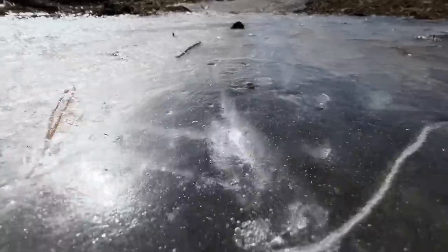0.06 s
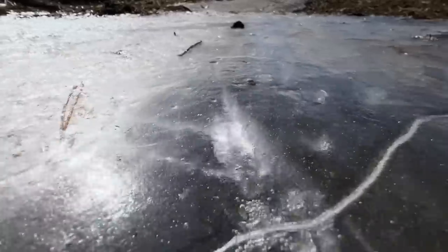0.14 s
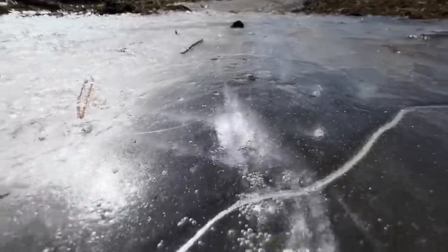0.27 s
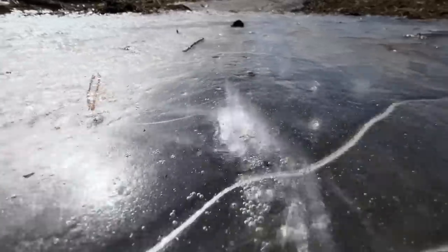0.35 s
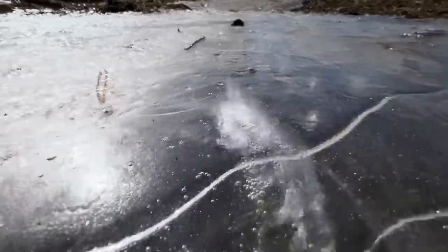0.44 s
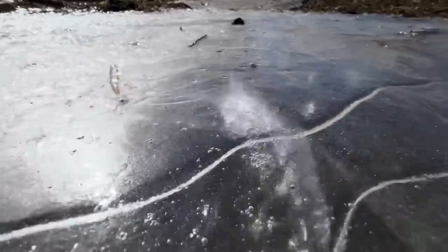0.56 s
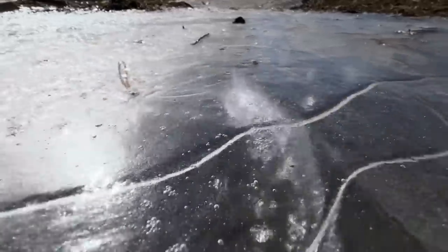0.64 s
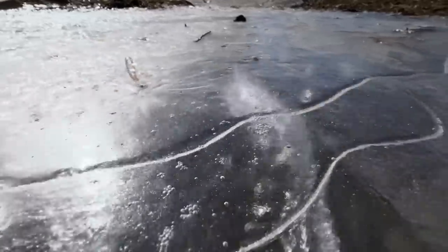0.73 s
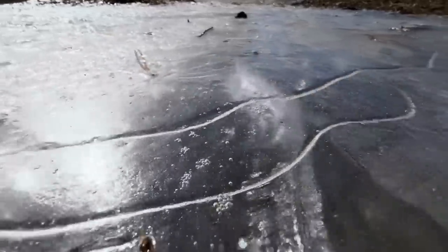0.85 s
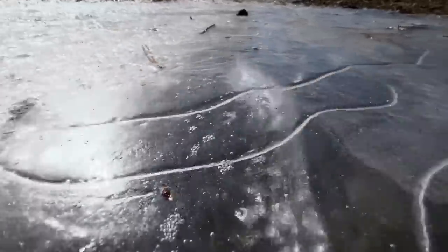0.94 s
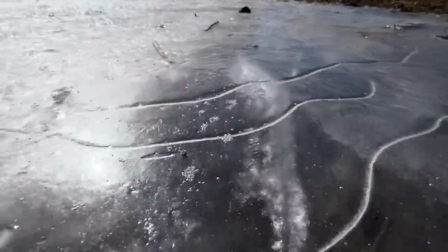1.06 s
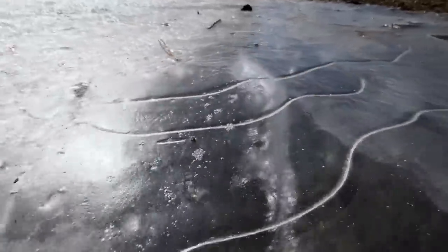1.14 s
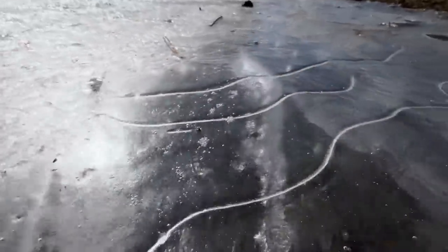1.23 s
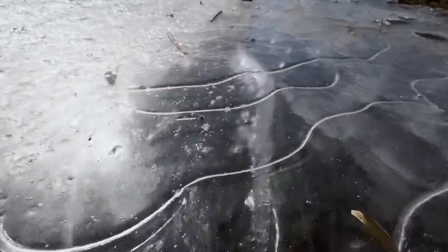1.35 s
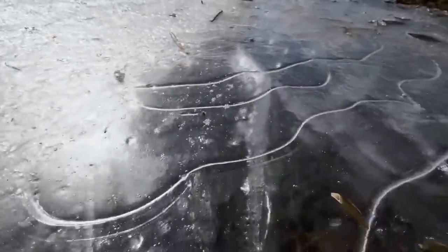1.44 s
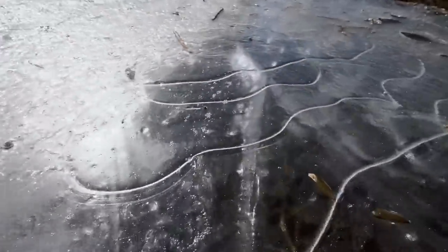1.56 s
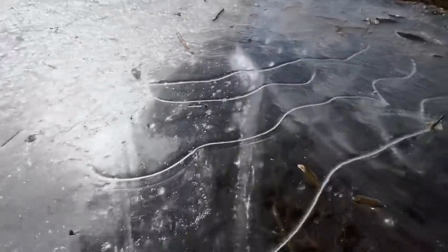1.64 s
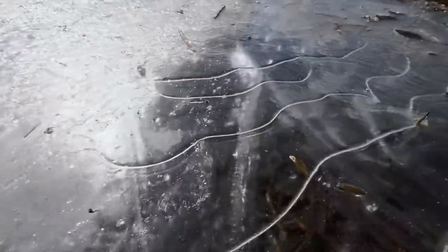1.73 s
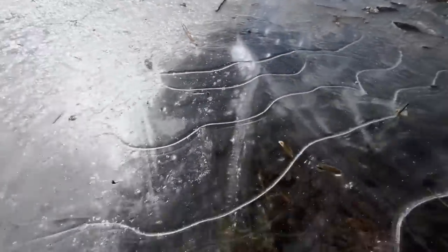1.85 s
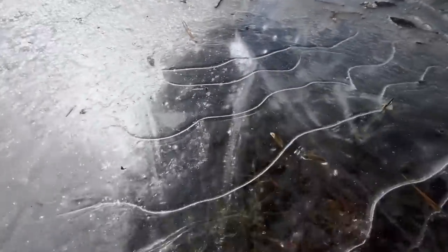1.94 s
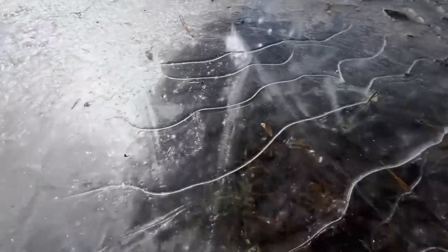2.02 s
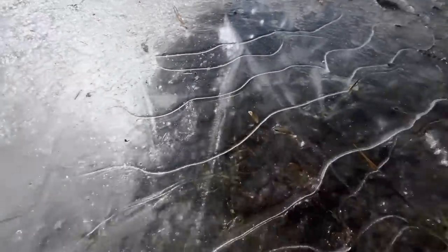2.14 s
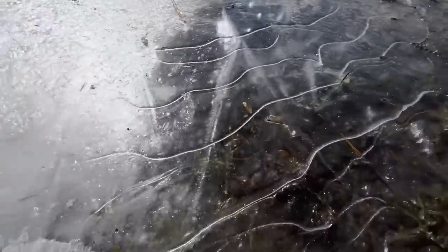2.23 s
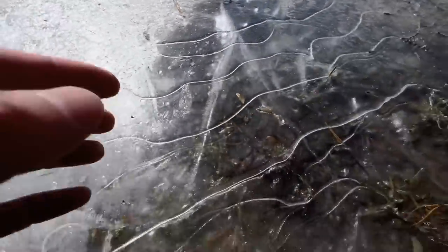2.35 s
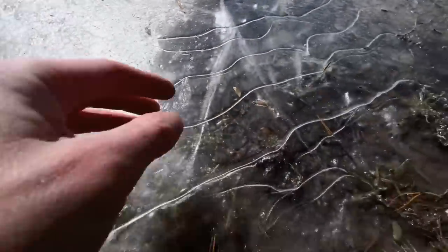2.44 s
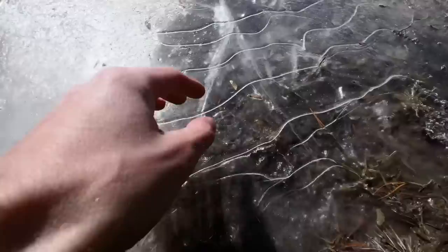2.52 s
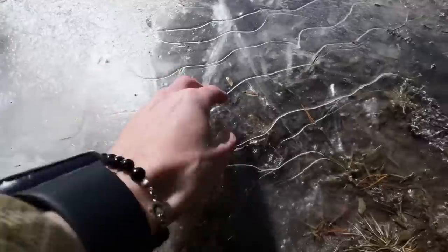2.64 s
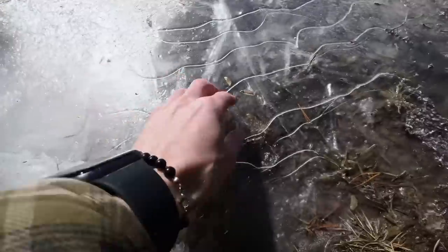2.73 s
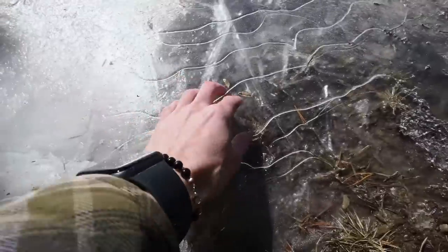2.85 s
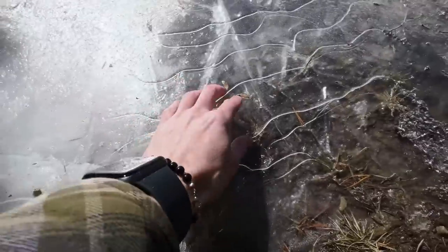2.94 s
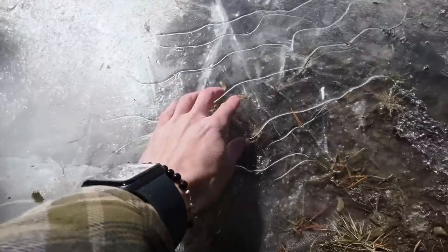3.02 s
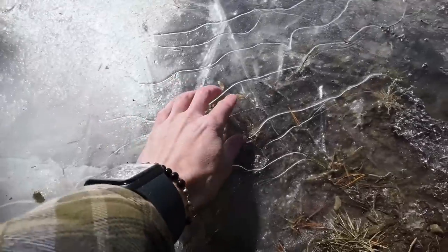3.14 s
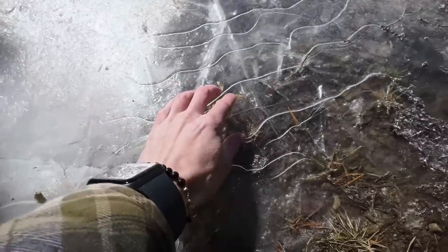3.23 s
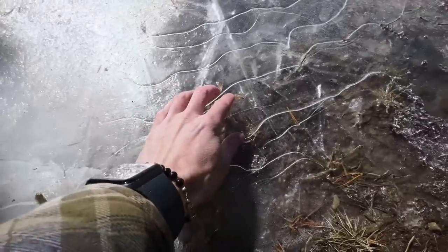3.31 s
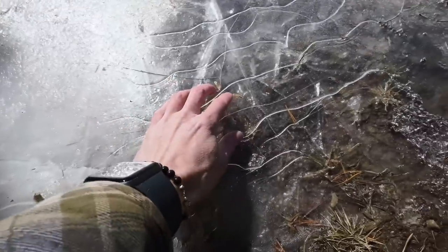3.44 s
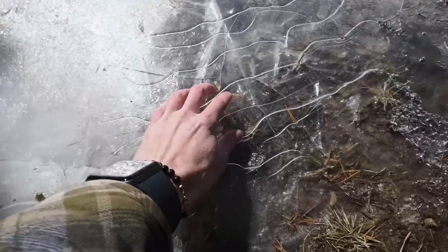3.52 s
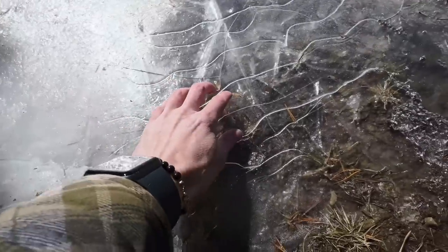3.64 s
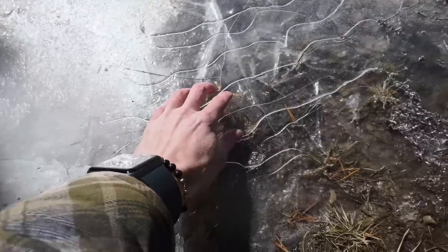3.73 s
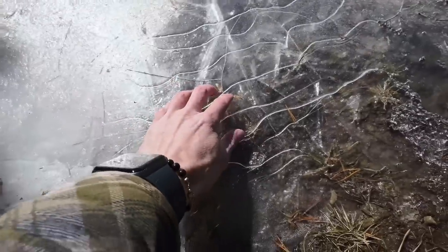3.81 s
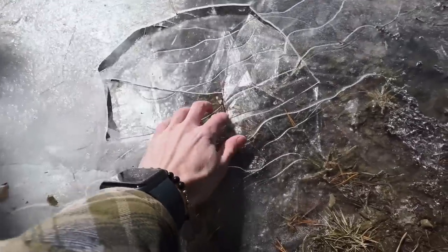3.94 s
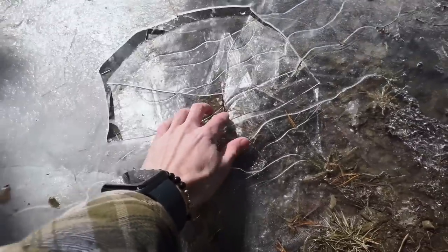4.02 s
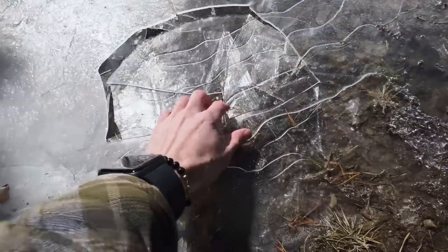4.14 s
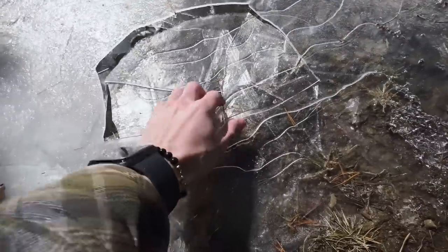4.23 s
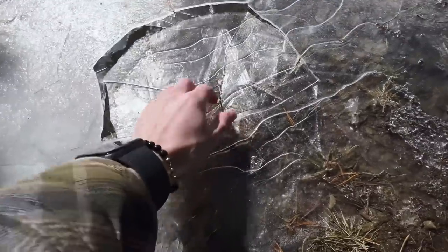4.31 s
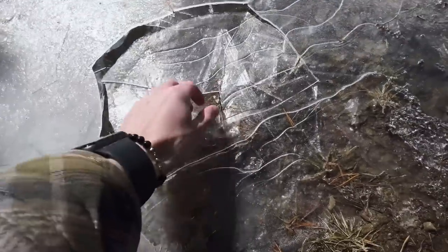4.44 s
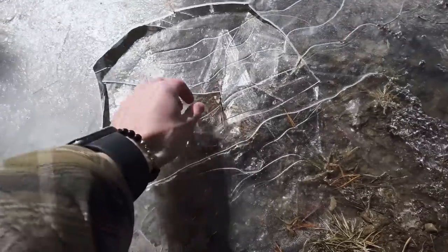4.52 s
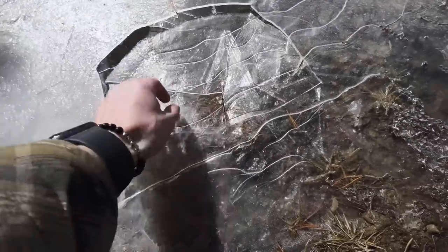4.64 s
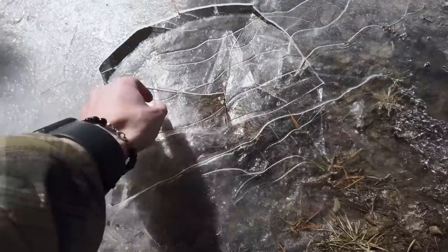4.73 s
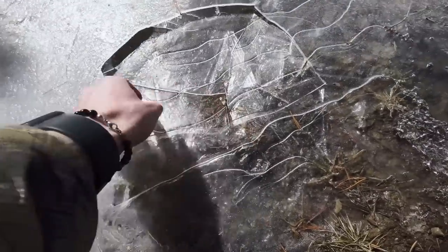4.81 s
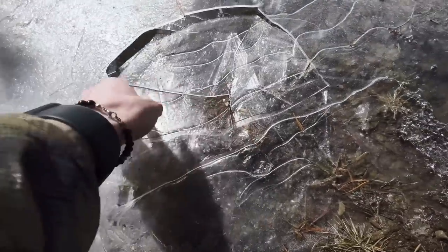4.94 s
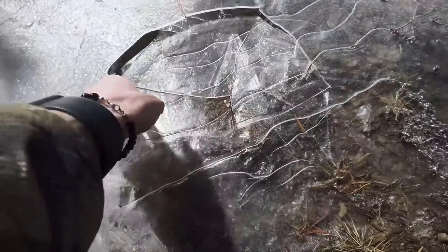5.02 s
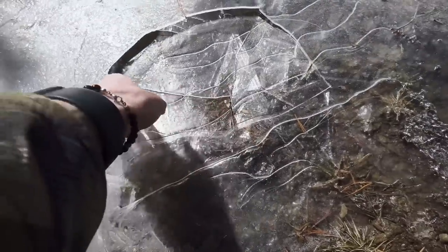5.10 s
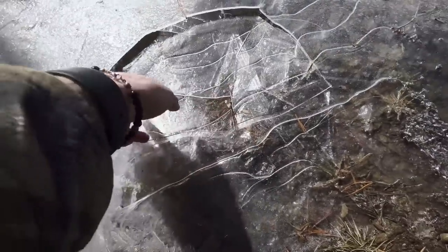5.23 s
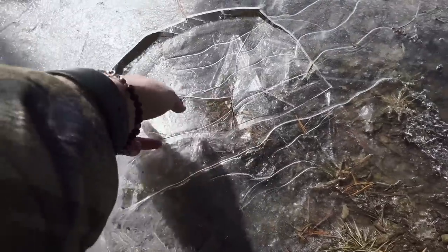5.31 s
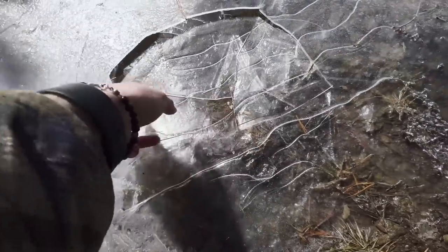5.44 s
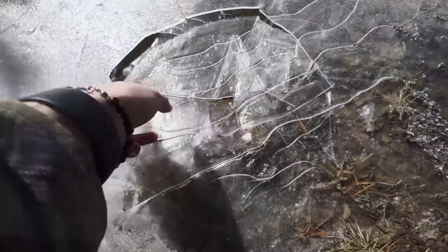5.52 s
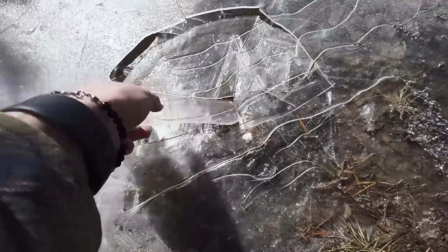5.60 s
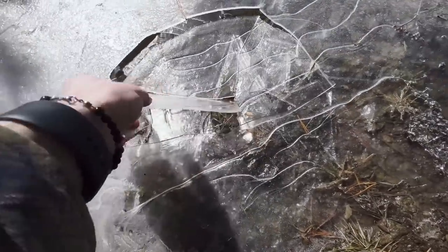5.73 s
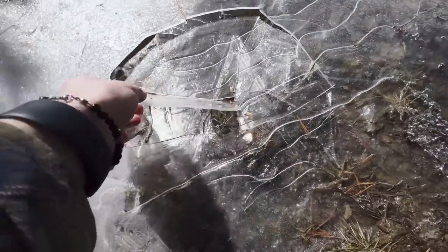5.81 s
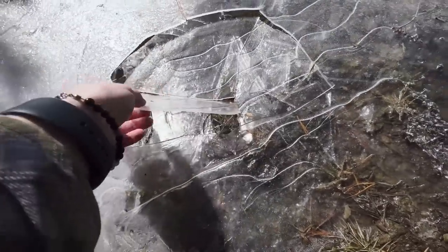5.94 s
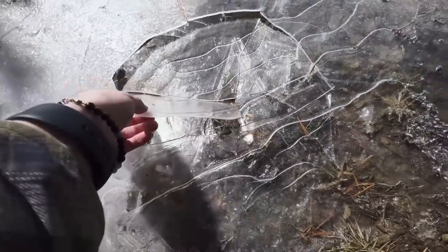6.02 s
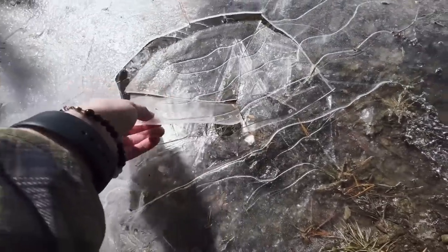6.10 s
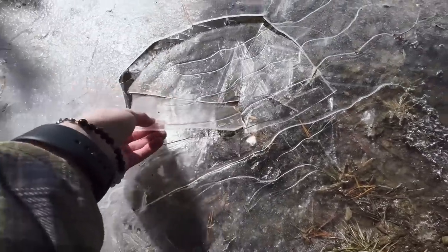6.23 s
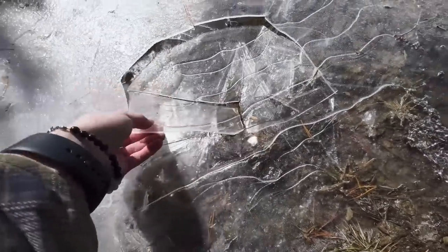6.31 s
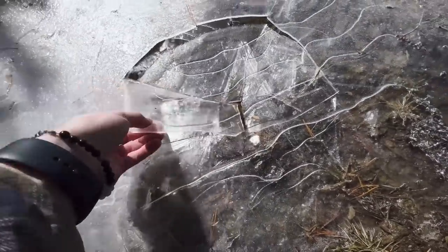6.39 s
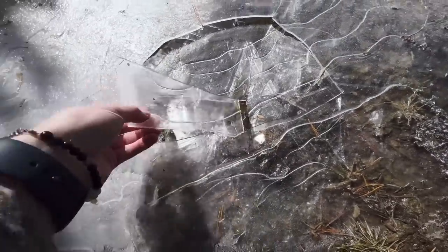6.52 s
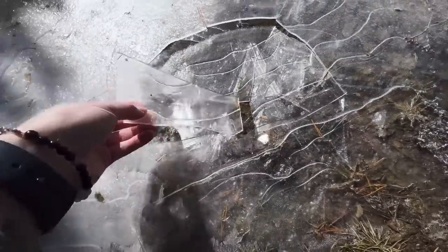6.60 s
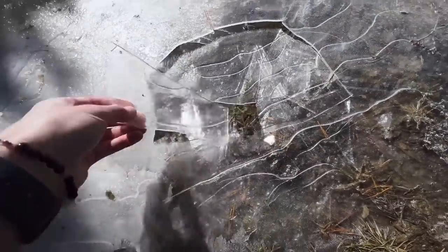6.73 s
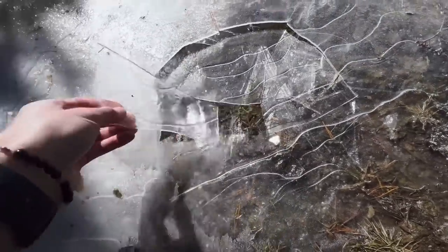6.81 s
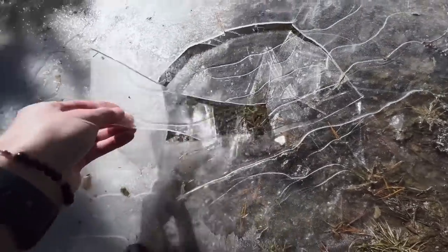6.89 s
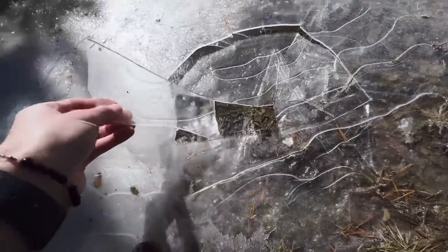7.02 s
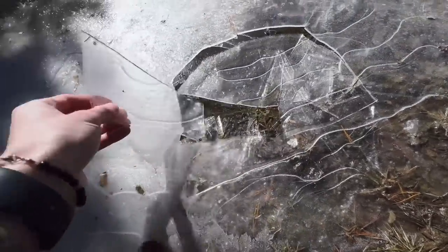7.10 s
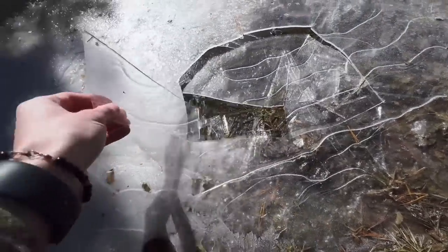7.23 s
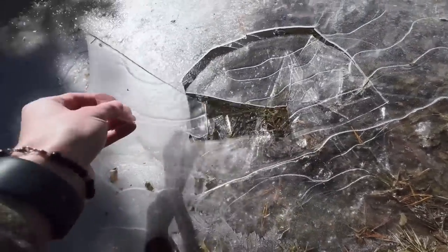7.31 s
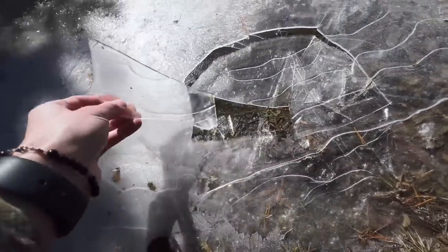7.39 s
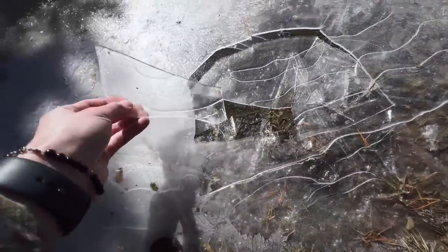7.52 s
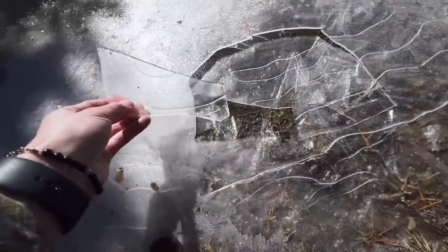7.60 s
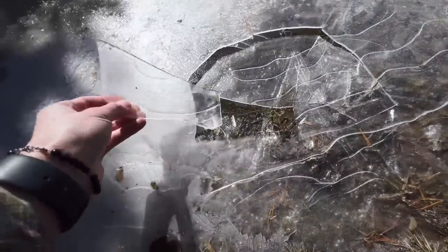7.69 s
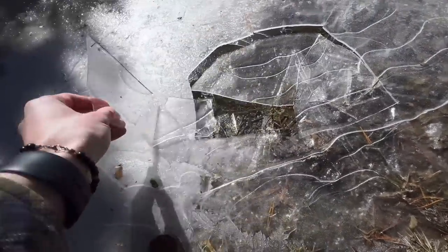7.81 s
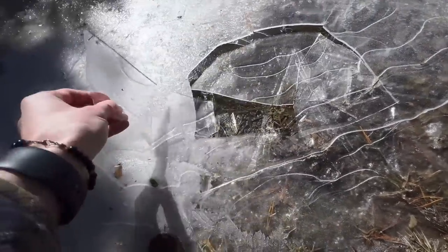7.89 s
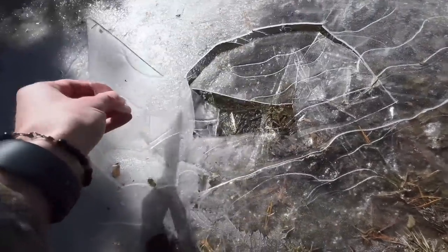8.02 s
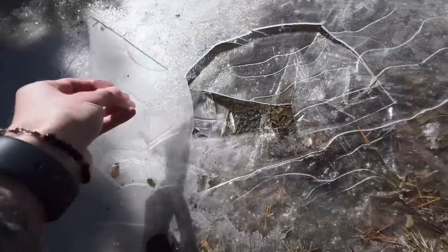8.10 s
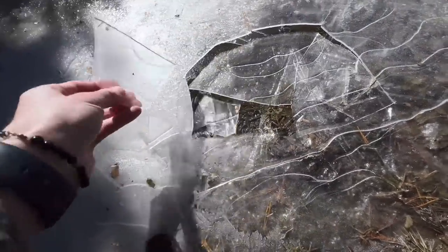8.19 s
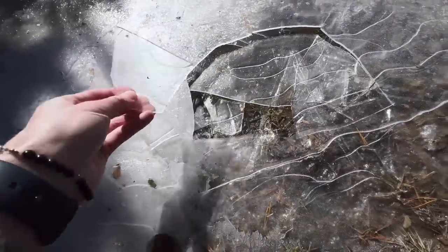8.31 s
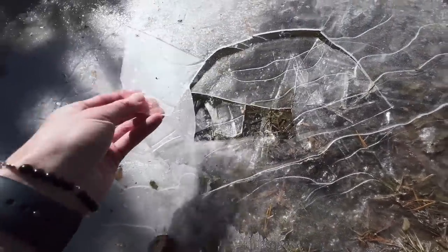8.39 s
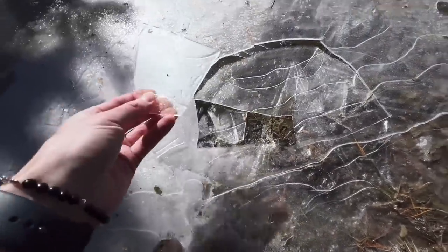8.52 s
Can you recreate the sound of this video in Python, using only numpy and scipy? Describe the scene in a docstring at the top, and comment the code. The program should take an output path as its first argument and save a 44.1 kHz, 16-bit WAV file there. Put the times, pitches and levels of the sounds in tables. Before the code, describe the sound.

Thin puddle ice crackles under a pressing palm, caves in with a sharp crunch, then a loose sheet grates, clinks and snaps in quiet woods.

```python
"""Breaking puddle ice

A hand presses on the thin ice over a forest puddle until it crackles and caves in,
then drags a loose sheet out and snaps it. Cracks are bursts of noise sent through the sheet as
bending waves, treble first, so each falls in pitch; broken edges grate as showers of tiny clicks.
Shards clink as fading sine tones and small birds call far off as gliding whistles.
Filtered noise makes the hush, a puff of wind and the palm's rub; low tones make handling bumps."""
import sys
import numpy as np
from scipy import signal
from scipy.fft import rfft, irfft, next_fast_len
from scipy.io import wavfile
from scipy.ndimage import uniform_filter1d

SR = 44100
rng = np.random.default_rng(int(sys.argv[2]) if len(sys.argv) > 2 else 0)


def put_to_file(sound):
    """Save the sound as 16-bit audio at rate SR, in the file named by the first command-line argument."""
    columns = np.atleast_2d(sound).T  # one column per channel
    safe = np.clip(columns, -1, 1)
    whole_steps = np.round(safe * 32767)
    wavfile.write(sys.argv[1], SR, whole_steps.astype(np.int16))


N = 377055
TIME = np.arange(N) / SR
CUTOFF_HZ = 15900

# In all tables, t60_s is the time to fade by 60 dB, and levels are as they stand before
# the trims in the functions: settings such as level_db that shift a whole layer.


def from_db(db):
    """Turn decibels into a plain gain."""
    return 10 ** (np.asarray(db) / 20)


def rms_one(x):
    """Scale a signal to an rms of 1."""
    return x / np.sqrt(np.mean(x ** 2) + 1e-20)


def add(out, start_s, sound):
    """Mix a sound in at its start time."""
    start = max(0, round(start_s * SR))
    out[start:start + len(sound)] += sound[:N - start]


def band(x, low_hz, high_hz, order=3):
    """Keep only the part of a sound between two pitches."""
    edges = [low_hz, min(high_hz, .45 * SR)]
    return signal.sosfilt(signal.butter(order, edges, "band", fs=SR, output="sos"), x)


def colour(x, spectrum):
    """Shape a signal with a gain curve that falls away outside its ends; rms 1."""
    hz, db = np.transpose(spectrum)
    size = next_fast_len(N)
    f = np.maximum(np.fft.rfftfreq(size, 1 / SR), 1)
    gain = from_db(np.interp(np.log(f), np.log(hz), db))
    gain = gain * np.minimum(f / hz[0], 1) ** 2 * np.minimum(hz[-1] / f, 1) ** 2
    return rms_one(irfft(rfft(x, size) * gain, size)[:N])


def gestures(rows, attack_share, level_column=3):
    """Gain of a row of gestures: each builds up, holds and dies away; overlaps add as power."""
    power = np.zeros(N)
    for row in rows:
        start_s, length_s, t60_s = row[:3]
        t = TIME[:int((length_s + 2 * t60_s) * SR)]
        attack = np.minimum(t / (attack_share * length_s), 1)
        fade_db = -60 * np.maximum(t - length_s, 0) / t60_s
        add(power, start_s, (attack * from_db(row[level_column] + fade_db)) ** 2)
    return np.sqrt(power)


def rings(rows, rise_s):
    """Struck tones that swell for an instant and die away."""
    out, t = np.zeros(N), np.arange(SR // 3) / SR
    for start_s, pitch_hz, level_db, t60_s in rows:
        fade = from_db(level_db - 60 * t / t60_s)
        swell = 1 - np.exp(-t / rise_s)
        add(out, start_s, fade * swell * np.sin(2 * np.pi * pitch_hz * t))
    return out


def through_sheet(x, modes, modes_db, lag_s):
    """Bending waves arrive treble first, late in step with 1 / sqrt(Hz), and set the ice ringing."""
    size = next_fast_len(len(x) + SR // 10)
    f = np.fft.rfftfreq(size, 1 / SR)
    # lag_s is the travel time at 500 Hz; the travel time at CUTOFF_HZ is taken off every pitch
    cycles = lag_s * np.sqrt(500) * (2 * np.sqrt(f) - f / np.sqrt(CUTOFF_HZ))
    x = irfft(rfft(x, size) * np.exp(-2j * np.pi * cycles), size)[:len(x)]
    ringing = 0
    for pitch_hz, width_hz, level_db in modes:
        resonance = signal.lfilter(*signal.iirpeak(pitch_hz, pitch_hz / width_hz, SR), x)
        ringing = ringing + from_db(level_db + modes_db) * resonance
    return x + ringing


def grains(per_s, spread_db, bed_db, spectrum, modes):
    """Tiny fractures of uneven size, each with a brief scatter, sent through the ice; rms 1."""
    sizes = from_db(spread_db * np.minimum(rng.exponential(1, N), 3)) * rng.choice([-1, 1], N)
    clicks = rms_one(sizes * (rng.random(N) < per_s / SR))
    # each click leaves a short trail of noise whose power fades over about 1.6 ms
    trail_power = signal.lfilter([1], [1, -np.exp(-1 / (0.0016 * SR))], clicks ** 2 + 1e-12)
    scatter = np.sqrt(trail_power) * rng.standard_normal(N)
    fractures = clicks + from_db(bed_db) * rms_one(scatter)
    return colour(through_sheet(fractures, modes, modes_db=-4.5, lag_s=0.00399), spectrum)


# tone of the forest air: pitch_hz, gain_db
FOREST = [(15, -50), (25, -26), (42, 2), (64, 2), (170, -4.5), (236, -5), (309, -8), (962, -13.5),
          (1560, -18), (2690, -21), (4030, -24.5), (12500, -33), (16000, -33.5)]
# level at which the hush is heard, from moment to moment: time_s, level_db (in its lower range)
HUSH = [(1.0, -58), (1.6, -56.5), (2.6, -57), (4.76, -64), (5.15, -61), (6.65, -56), (7.07, -59),
        (7.52, -56.5), (8.42, -59)]


def forest_hush(level_db=-1.2):
    """The hush of the forest: noise, strongest in the lows; its heard level drifts and dips."""
    forest = colour(rng.standard_normal(N), FOREST)
    heard_level = from_db(np.interp(TIME, *np.transpose(HUSH)) + level_db)
    return heard_level * forest / np.std(band(forest, 51, 1500))


# one puff of wind: start_s, length_s, t60_s, level_db
GUST = [(0.0, 0.746, 0.27, -45)]
# tone of the wind at the microphone: pitch_hz, gain_db
RUMBLE = [(15, -46), (25, -18), (54, 2), (82, 0.5), (205, -7), (270, -14.5), (339, -7), (477, -17.5),
          (1200, -27), (1560, -41), (2640, -120)]


def wind_puff(level_db=-2.0):
    """A puff of wind on the microphone: low noise that starts quickly and dies away."""
    rumble = colour(rng.standard_normal(N), RUMBLE)
    return from_db(level_db) * gestures(GUST, attack_share=0.0046) * rumble


# clearest ticks of thawing ice: start_s, peak_db, pitch_hz (sets the band of noise)
TICKS = [(0.037, -38.5, 3450), (1.243, -37, 3220), (1.269, -41, 11000), (1.555, -40.5, 9900),
         (1.754, -42, 11000), (2.399, -34, 8900), (4.301, -41, 6000), (4.388, -40.5, 11140),
         (4.576, -39.5, 6160), (4.444, -38, 7100), (4.486, -40.5, 10000), (4.882, -38, 8000),
         (5.884, -31.5, 4580), (6.165, -31, 7960)]


def ticks(t60_s=0.018, level_db=-4.0, faint_per_s=21.0, faint_db=-50.5,
          settle_start_s=5.1, settle_s=2.8, settle_per_s=14.0, settle_db=-49.5):
    """Pinpoint snaps of noise in the sunlit ice, with faint random ones, more as the break settles."""
    out, t = np.zeros(N), np.arange(SR // 20) / SR
    faint = [(u * N / SR, faint_db + 8 * v ** 2, 5000 + 7000 * w)
             for u, v, w in rng.random((int(faint_per_s * N / SR), 3))]
    settling = [(settle_start_s + settle_s * u, settle_db + 8 * v, 5000 + 7000 * w)
                for u, v, w in rng.random((int(settle_per_s * settle_s), 3))]
    for start_s, peak_db, pitch_hz in list(TICKS) + faint + settling:
        burst = rng.standard_normal(len(t)) * from_db(-60 * t / t60_s)
        tick = band(burst, pitch_hz * 0.32, pitch_hz * 1.3, order=2)
        add(out, start_s, from_db(peak_db + level_db) * tick / np.abs(tick).max())
    return out


# rising contact chirps: start_s, start_pitch_hz, rms_db
CHIRPS = [(0.127, 2380, -71), (0.255, 3330, -72), (6.622, 2900, -60), (7.52, 2790, -68), (7.61, 3020, -62),
          (7.686, 3650, -64.5), (8.472, 3440, -53.5)]
CHIRP_S, CHIRP_OCTAVES_PER_S = 0.031, 12.0  # length and average climb, the same for all chirps
UPPER_VOICE_RATIO, UPPER_VOICE_DB = 1.24, -8.5  # a second, higher voice sounds with each chirp
# one short song phrase: start_s, length_s, start_pitch_hz, end_pitch_hz, rms_db
SONG = [(1.94, .062, 2600, 3970, -64), (2.046, 0.021, 5240, 4200, -63), (2.047, 0.017, 2900, 2120, -64),
        (2.07, 0.017, 2850, 3230, -64), (2.115, 0.065, 3450, 3500, -70), (2.169, 0.041, 2830, 2410, -60.5),
        (2.217, .025, 4100, 4520, -61), (2.225, .09, 2820, 3940, -65), (2.253, .028, 5800, 6140, -64),
        (2.258, 0.194, 2623, 2700, -70), (2.3, 0.077, 3720, 3840, -67)]


def birds(waver=0.0043, level_db=1.5, trees_db=-8.0, trees_t60_s=.4):
    """Thin gliding whistles with a slight waver, scattered by the trunks as a fading echo."""
    out, rise = np.zeros(N), 2 ** (CHIRP_OCTAVES_PER_S * CHIRP_S)
    voices = ((1, 0), (UPPER_VOICE_RATIO, UPPER_VOICE_DB))
    chirps = [(start_s, CHIRP_S, hz * ratio, hz * ratio * rise, rms_db + voice_db)
              for start_s, hz, rms_db in CHIRPS for ratio, voice_db in voices]
    for start_s, length_s, start_hz, end_hz, rms_db in list(SONG) + chirps:
        u = np.linspace(0, 1, round(length_s * SR))
        wobble = rms_one(uniform_filter1d(rng.standard_normal(len(u)), size=60))
        hz = (start_hz + (end_hz - start_hz) * u) * (1 + waver * wobble)
        whistle = np.sqrt(u * (1 - u)) * np.sin(2 * np.pi * np.cumsum(hz) / SR)
        add(out, start_s, from_db(rms_db + level_db) * rms_one(whistle))
    echoes = rng.standard_normal(SR // 2) * from_db(-60 * TIME[:SR // 2] / trees_t60_s)
    return out + from_db(trees_db) * signal.fftconvolve(out, echoes / np.linalg.norm(echoes))[:N]


# the palm rests and rubs on the ice: start_s, length_s, t60_s, level_db
RUBS = [(2.72, 0.024, .4, -35), (2.82, 0.21, .5, -41.5), (3.05, 0.33, .5, -45)]
# tone of the rubbing: pitch_hz, gain_db
RUB = [(35, -17.5), (80, -2), (150, -10.5), (195, 4), (250, -15), (700, -20.5), (1500, -29.5)]


def palm_rub(level_db=-3.5):
    """The dull rub of the palm on the ice: low noise."""
    rub = colour(rng.standard_normal(N), RUB)
    return from_db(level_db) * gestures(RUBS, attack_share=0.086) * rub


# cracks and knocks; levels are energy as an rms over 10 ms:
# start_s, level_db, brightness_db_per_octave, thud_db (sheet on its air gap), t60_s (near 1 kHz)
CRACKS = [(2.737, -46, -1.5, -39, 0.1), (2.977, -32.5, 2.4, -38, 0.024), (2.998, -30.5, 1.3, -43, 0.05),
          (3.218, -30, 0.5, -60, 0.065), (3.271, -22, 2, -29.5, 0.053), (3.326, -28.5, 1, -56, 0.062),
          (3.409, -20.5, 3, -15.5, 0.06), (3.425, -21.5, -4, -20, 0.18), (3.437, -27.5, 3.5, -27, 0.14),
          (3.448, -21.5, 1, -46, 0.06), (3.643, -18, 1.3, -25.5, 0.029), (3.827, -17.5, 1.9, -14.5, 0.046),
          (3.843, -11.5, -1.1, -21, 0.17), (3.862, -22, -1.5, -22, 0.1), (3.878, -18.5, 1.5, -24, 0.15),
          (3.909, -19, 1.2, -30.5, 0.38), (4.046, -33, 1, -53, 0.53), (4.106, -40, 2, -70, 0.16),
          (4.229, -51.5, 1.5, -62, 0.095), (4.336, -54.5, 1, -74.5, 0.02), (4.629, -56.5, -.5, -73.5, .05),
          (4.67, -58, 1.5, -72, 0.021), (4.822, -60, 2.5, -69, 0.024), (5.018, -43, -4, -56, 0.059),
          (5.312, -41.5, 2, -70, 0.095), (5.48, -32, 0.5, -57, 0.12), (5.507, -34, 1.9, -40.5, 0.07),
          (5.571, -36, 2.8, -46, 0.26), (5.722, -34, 3.5, -46, 0.11), (5.733, -35, 2, -40.5, 0.066),
          (5.929, -42.5, 3, -68, 0.18), (6.058, -37, -5, -38, 0.043), (6.256, -30.5, 3.5, -43, 0.046),
          (6.292, -31, 3, -55.5, .026), (6.352, -19, 1.3, -27, 0.048), (6.374, -15, -2.7, -18.5, 0.12),
          (6.381, -22.5, 2.5, -26, 0.14), (6.397, -20.5, -8, -27, 0.071), (6.491, -29.5, 1, -40, 0.088),
          (6.752, -18.5, -2.3, -26, 0.051), (6.79, -18, -1.25, -26.5, 0.11), (6.822, -18.5, -3, -30, 0.2),
          (6.858, -21, -1.5, -37, .082), (6.877, -26.5, 0, -37, 0.12), (6.901, -31.5, -1, -50, 0.037),
          (6.926, -31, -.5, -37, 0.062), (6.967, -47, 5.5, -50, 0.031), (7.167, -42.5, 4.5, -66, 0.042),
          (7.183, -47, 8, -56.5, 0.17), (7.194, -23.5, -1.1, -15.5, 0.1), (7.218, -31, -6, -25, 0.089),
          (7.321, -55.5, 0, -69, .031), (7.752, -22.5, 4, -24.5, 0.03), (7.765, -36, -9, -17, 0.032),
          (7.781, -26.5, 0.5, -29.5, 0.31), (7.806, -23.5, 2.5, -46, 0.014),
          (7.813, -24.5, 2.5, -28.5, 0.016), (7.825, -24.5, -0.5, -28, 0.083),
          (7.845, -25, 0.9, -47, 0.074), (8.013, -30, 0, -40.5, 0.066), (8.072, -27.5, -1, -60, 0.093),
          (8.15, -35, 1.5, -52, 0.13), (8.221, -22, 4, -68, 0.065), (8.25, -31, 3, -48, 0.09),
          (8.292, -44, 0.5, -65, .029), (8.357, -59, 3, -76.5, 0.031)]
# borders between the five registers, thud to snap: pitch_hz
REGISTER_EDGES_HZ = [70, 330, 800, 2500, 6500, 16000]
# share of a crack in each register above the thud, at even brightness:
# hollow_db, clack_db, clink_db, snap_db
SHEET_REGISTERS = (-4, 0.5, -1.5, -5.5)
PIECE_REGISTERS = (-5.5, 1, -0.5, -7)
# resonances of the whole sheet over its air gap: pitch_hz, width_hz, level_db
SHEET = [(190, 16, -1.5), (495, 39, 5.5), (690, 20, 3.5), (1450, 56, -3), (3050, 330, 8), (3540, 180, 1.5),
         (4970, 40, -11), (5420, 98, -12), (6830, 63, -4), (7940, 230, 1.5), (7700, 65, 5.5),
         (11400, 1100, 1.5), (14000, 80, 3.5)]
# resonances of the loose piece: pitch_hz, width_hz, level_db
PIECE = [(252, 17.9, 6), (394, 28, 7), (477, 170, 7.5), (692, 72, 7), (1130, 12.2, 6), (1175, 30, -10),
         (1750, 18, 4), (2240, 40, -4.5), (2700, 22, 4.5), (2906, 84, 4), (3297, 250, 1), (3874, 117, 4),
         (4730, 120, 2.5), (5130, 25, 2), (5480, 59, -2), (7210, 100, -16), (11240, 570, 4.5)]
LOOSE_S = 4.8  # time at which the hand turns from the whole sheet to the loose piece


def cracks(direct=.5, scatter_db=4.5, tail_db=-31.5, tail_t60_s=0.25, damping=0.28,
           tear_s=0.00045, level_db=-1.24, pivot_hz=1400):
    """A sharp release, then a swarm of reflections from the edges; treble dies first."""
    out, t = np.zeros(N), np.arange(SR // 5) / SR
    lows, highs = np.array(REGISTER_EDGES_HZ[:-1]), np.array(REGISTER_EDGES_HZ[1:])
    centres = np.sqrt(lows * highs)
    for start_s, crack_db, brightness, thud_db, t60_s in CRACKS:
        whole = start_s < LOOSE_S
        modes, registers = (SHEET, SHEET_REGISTERS) if whole else (PIECE, PIECE_REGISTERS)
        tilt_db = brightness * np.log2(centres[1:] / pivot_hz)
        levels = [thud_db, *(crack_db + np.array(registers) + tilt_db)]
        unevenness = from_db(scatter_db * rng.standard_normal(len(t)))
        swarm = rms_one(rng.standard_normal(len(t)) * unevenness)
        swarm = swarm * (1 - np.exp(-t / tear_s))  # the crack takes an instant to run
        sign = rng.choice([-1, 1])
        softness = min(1, 0.034 / t60_s)  # long tears have a softer start
        wave = 0
        for low, high, hz, register_db in zip(lows, highs, centres, levels):
            life_s = t60_s * (hz / 1000) ** -damping
            paths = swarm * (from_db(-60 * t / life_s) + from_db(tail_db - 60 * t / tail_t60_s))
            paths[0] += sign * direct * np.linalg.norm(paths) * softness
            part = band(paths, low, high)
            wave = wave + from_db(register_db + level_db) * part / np.linalg.norm(part)
        rung = through_sheet(wave, modes, modes_db=-4.5, lag_s=.004)
        # the sheet changes the tone but not the energy; the last factor is the 10 ms rms
        add(out, start_s, rung * np.linalg.norm(wave) / np.linalg.norm(rung) * np.sqrt(SR / 100))
    return out


# pushes of the palm, the last one caving the sheet in:
# start_s, length_s, t60_s, crackle_db, flexing_db
PUSHES = [(2.94, 0.072, 0.13, -44.5, -48.5), (3.064, 0.054, 0.15, -28.5, -40),
          (3.205, 0.15, 0.42, -29, -54.5), (3.385, 0.069, 0.043, -19, -33.5),
          (3.465, 0.069, 0.05, -40.5, -50.5), (3.57, 0.067, 0.6, -41.5, -53),
          (3.643, 0.027, 0.13, -32.5, -31.5), (3.738, 0.041, 0.6, -27, -29.5),
          (3.835, 0.02, 0.35, -18, -28.5)]
PUSH_ATTACK_SHARE = .27  # part of each push's length spent building up
# tone of the crackle: pitch_hz, gain_db
CRACKLE = [(90, -16.5), (200, -8.5), (500, -5.5), (1100, -2), (3000, -1.5), (4500, 0.5), (8000, -2.5),
           (11300, -4.5), (16000, -6.5)]
# tone of bending ice: pitch_hz, gain_db
FLEXING = [(70, -9.5), (110, -5.5), (300, -5.5), (480, -1.5), (750, -4.5), (1500, -4.5), (3000, -17),
           (8000, -34)]


def pressing(crackle_db=2.0, flex_db=-1.5):
    """Cracks creep through the loaded ice as a dense crackle while the sheet flexes."""
    crackle = gestures(PUSHES, PUSH_ATTACK_SHARE) * grains(2000, 6.0, 2.4, CRACKLE, SHEET)
    flex_gain = gestures(PUSHES, PUSH_ATTACK_SHARE, level_column=4)
    flex = flex_gain * grains(500, 0.63, 0.1, FLEXING, SHEET)
    return from_db(crackle_db) * crackle + from_db(flex_db) * flex


def chips(per_s=520.0, level_db=-9.0, spread_db=4.0, cycles=170.0, low_hz=1500, high_hz=11000,
          fall_db=2.0, count=36):
    """Splinters are knocked about wherever the ice crackles or grates; each size has its own pitch."""
    activity = gestures(PUSHES, PUSH_ATTACK_SHARE) + gestures(SLIDES, SLIDE_ATTACK_SHARE)
    out, force = np.zeros(N), 2 * rng.random(N) - 1
    for smallness in (np.arange(count) + rng.random(count)) / count:
        hz = min(low_hz * (high_hz / low_hz) ** smallness, .4 * SR)
        at = np.flatnonzero(rng.random(N, dtype=np.float32) < per_s / count / SR)
        knocks = np.full(N, 1e-18)
        knocks[at] = activity[at] * from_db(level_db - fall_db * smallness + spread_db * force[at])
        # a ringing filter that fades by 60 dB in the given number of cycles
        r, w = from_db(-60 * hz / (cycles * SR)), 2 * np.pi * hz / SR
        out += signal.lfilter([0, np.sin(w)], [1, -2 * r * np.cos(w), r * r], knocks)
    return out


# handling bumps: start_s, pitch_hz, level_db (before the swell), t60_s
BUMPS = [(3.606, 52.6, -30.5, 0.32), (4.375, 62, -45.5, 0.14), (4.594, 67, -27, 0.12),
         (7.385, 45.6, -41, 0.15), (7.622, 61.6, -25.5, 0.12), (7.664, 48.8, -31.5, 0.25)]


def handling_bumps():
    """Handling thumps at the microphone: short, very low tones."""
    return rings(BUMPS, rise_s=0.0019)


# shards and the loose piece ringing: start_s, pitch_hz, level_db (before the swell), t60_s
SHARDS = [(4.044, 4840, -32.5, 0.082), (4.046, 3500, -35, 0.089), (4.107, 3490, -39, 0.097),
          (5.909, 4200, -43, 0.092), (5.928, 3740, -40, .07), (6.374, 2080, -9, 0.041),
          (6.378, 2660, -11.5, 0.046), (6.385, 374, -11, 0.12), (6.794, 486, -6.5, 0.057),
          (6.808, 520, -20, 0.099), (6.859, 540, -13.5, 0.058), (6.905, 505, -19, 0.078),
          (6.967, 1980, -30.5, 0.027), (7.181, 4870, -28.5, 0.07), (7.184, 1934, -32, 0.12),
          (7.202, 442, -10, 0.061), (7.203, 264, -20, 0.13), (7.766, 380.5, -14.5, 0.12),
          (7.77, 1136, -17, .14), (7.782, 4170, -18, 0.087), (7.805, 4100, -1, 0.019),
          (7.814, 5300, -8, 0.024), (7.825, 5240, -9, 0.034), (7.825, 2065, -22, 0.11),
          (8.172, 2040, -30.5, .25), (8.221, 3570, -2, 0.011), (8.225, 1656, -12.5, .042),
          (8.252, 2430, -5, 0.018)]


def shards():
    """Pieces of ice clink and ring: each is a pure tone that dies away fast."""
    return rings(SHARDS, rise_s=0.00029)


# slides of the broken edges over each other:
# start_s, length_s, t60_s, grating_db, flexing_db
SLIDES = [(4.89, 0.045, 0.83, -52, -56), (5.18, 0.26, 0.37, -53.5, -55), (5.31, 0.019, 0.14, -44.5, -58),
          (5.41, 0.099, 0.81, -35, -42.5), (5.6, 0.084, 0.98, -43.5, -72), (5.9, 0.027, 0.31, -44.5, -49),
          (5.99, 0.11, 0.43, -46.5, -68), (6.17, 0.21, .1, -36, -66), (6.215, 0.064, .3, -39.5, -52.5),
          (6.308, .04, .15, -25.5, -34), (6.36, 0.022, 0.21, -22, -14.5), (6.805, 0.053, 0.098, -28.5, -38),
          (7.196, .012, 0.16, -35, -28), (7.752, 0.028, 0.29, -28, -16.5), (7.86, 0.31, 0.25, -47, -39.5),
          (7.98, 0.061, 0.23, -37, -32), (8.07, 0.095, 0.11, -36, -25.5), (8.175, 0.031, 0.15, -30.5, -64)]
SLIDE_ATTACK_SHARE = 0.36  # part of each slide's length spent building up
# tone of the grating: pitch_hz, gain_db
GRATING = [(150, -21), (300, -22.5), (560, -13), (950, -8.5), (1800, -4.5), (2900, -2.5), (5400, -9),
           (7000, -11), (12000, -12), (16000, -11)]


def dragging(grating_db=-1.5, flex_db=-5.0):
    """Rough edges catch and slip as the loose piece is drawn out, heard as a shower of clicks."""
    grating = gestures(SLIDES, SLIDE_ATTACK_SHARE) * grains(380, 4.9, 20.0, GRATING, PIECE)
    flex_gain = gestures(SLIDES, SLIDE_ATTACK_SHARE, level_column=4)
    flex = flex_gain * grains(400, 2.33, 0.1, FLEXING, PIECE)
    return from_db(grating_db) * grating + from_db(flex_db) * flex


def scene():
    """The ice close by, the forest behind it."""
    ice = ticks() + cracks() + pressing() + chips() + shards() + dragging()
    # a thin sheet radiates no deep bass
    ice = signal.sosfilt(signal.butter(3, 55, "high", fs=SR, output="sos"), ice)
    background = forest_hush() + wind_puff() + birds() + palm_rub() + handling_bumps()
    return (ice + background)[None]


def record(dry):
    """High peaks are gently rounded, and the top of the treble is cut."""
    rounded = 1.8 * np.tanh(dry / 1.8)
    return signal.sosfilt(signal.ellip(10, .2, 70, CUTOFF_HZ, fs=SR, output="sos"), rounded)


dry = scene()
out = record(dry)
put_to_file(out)
```